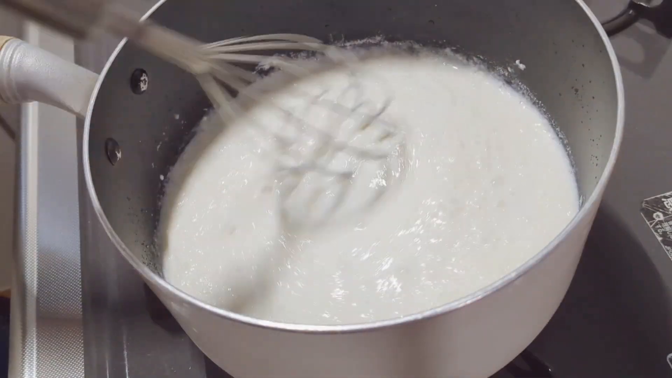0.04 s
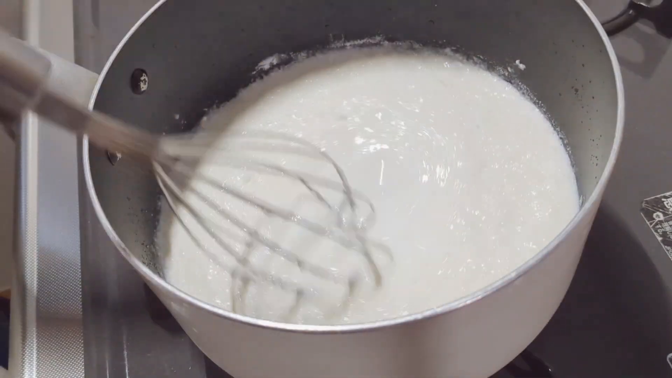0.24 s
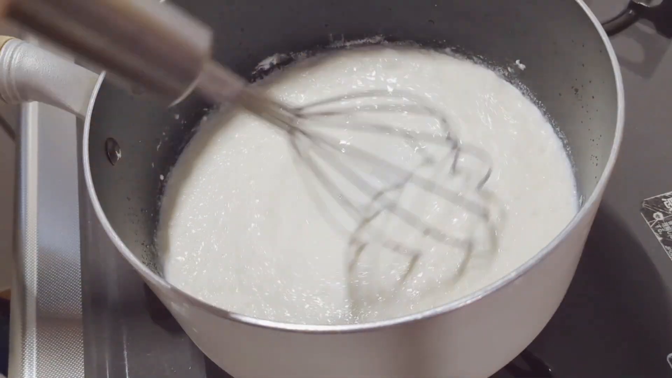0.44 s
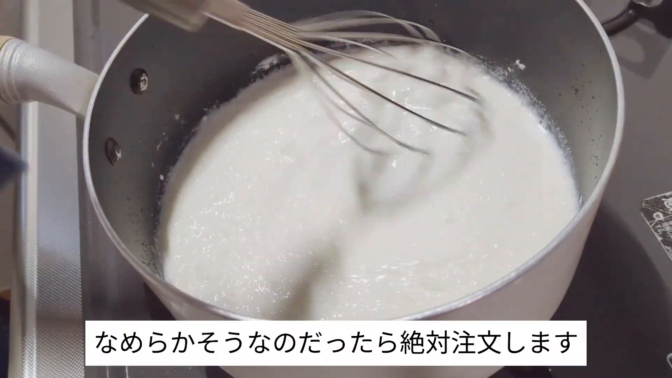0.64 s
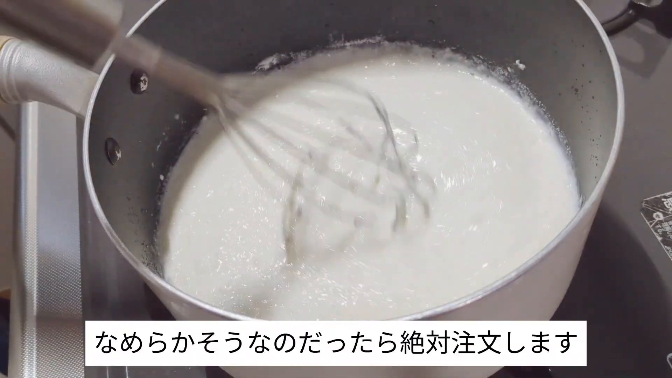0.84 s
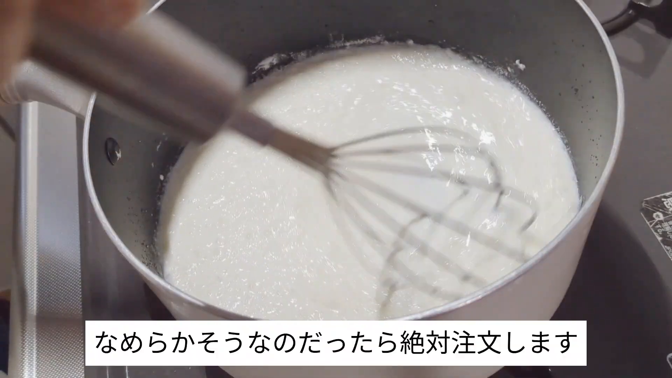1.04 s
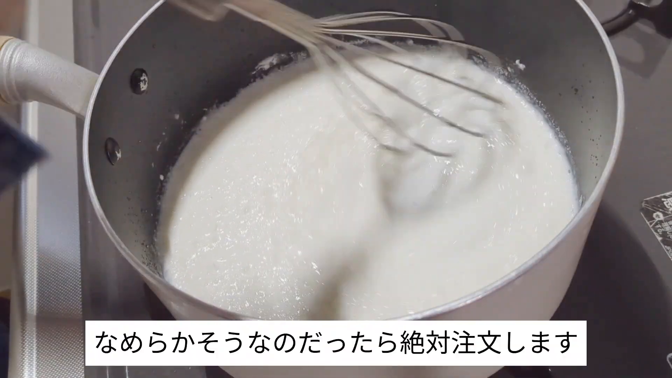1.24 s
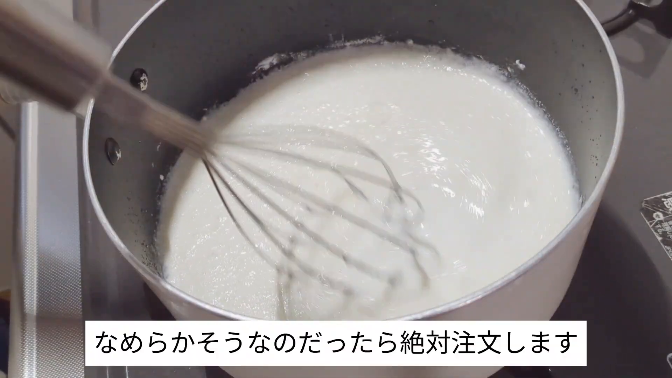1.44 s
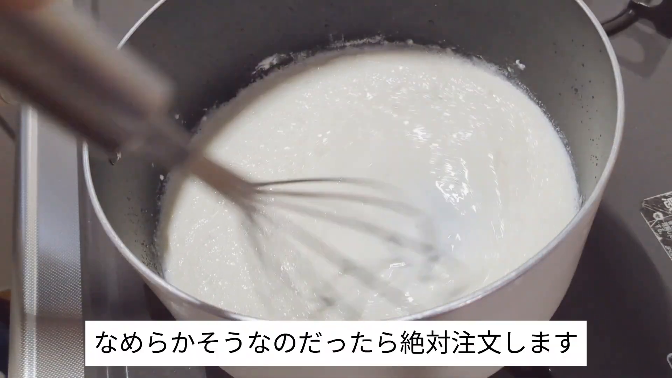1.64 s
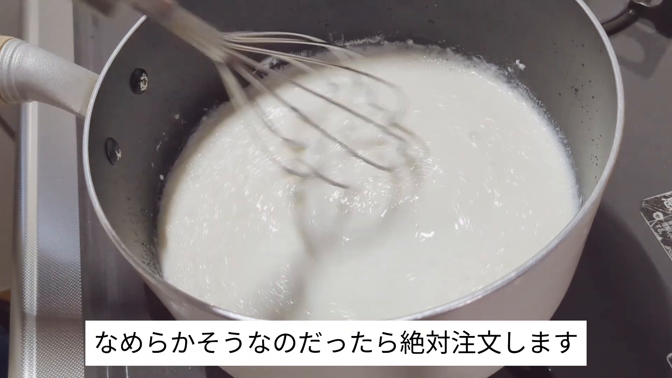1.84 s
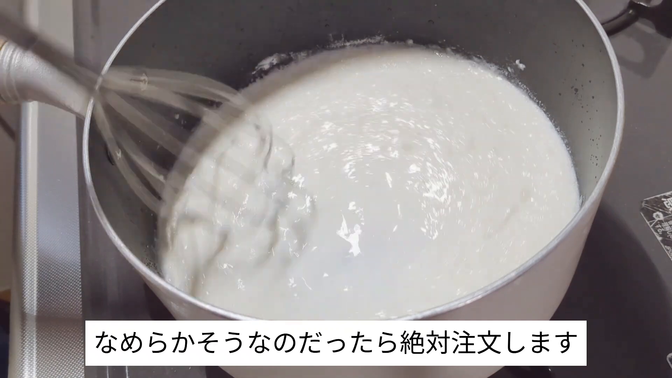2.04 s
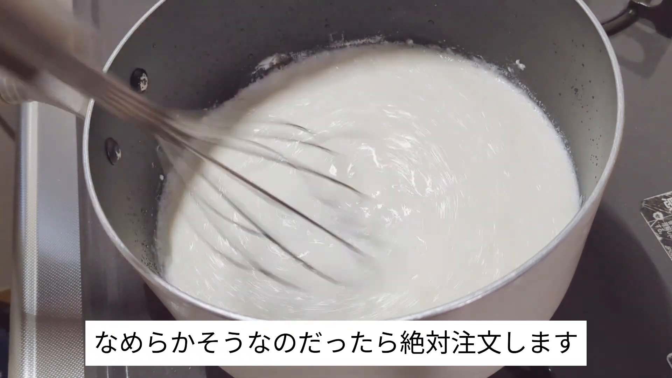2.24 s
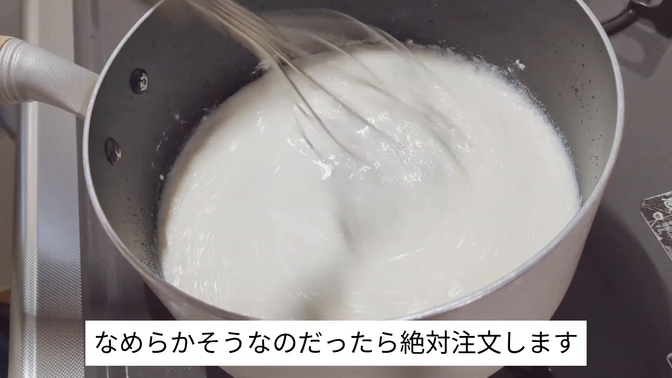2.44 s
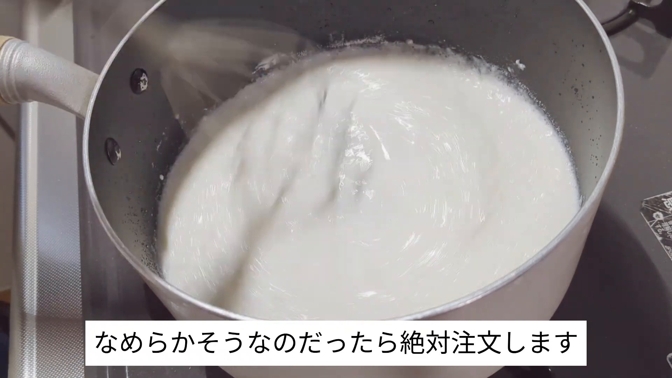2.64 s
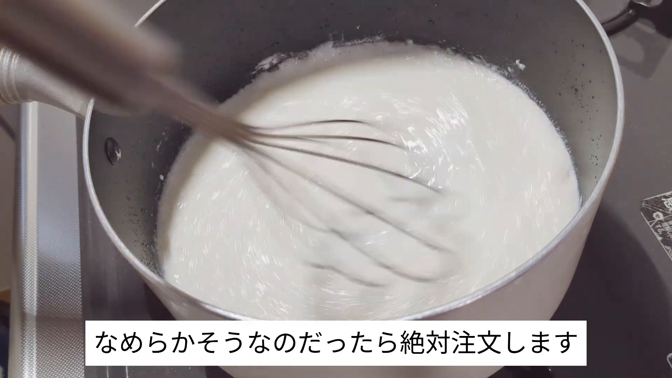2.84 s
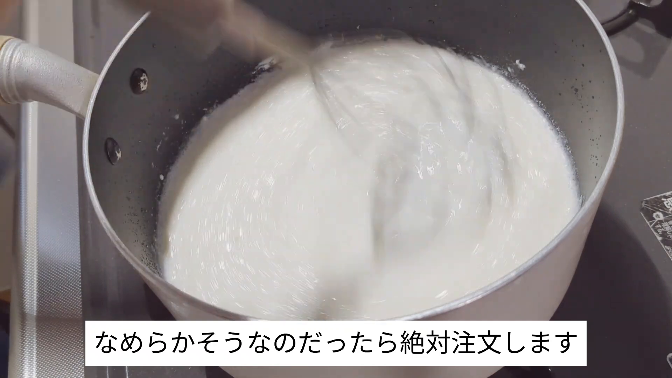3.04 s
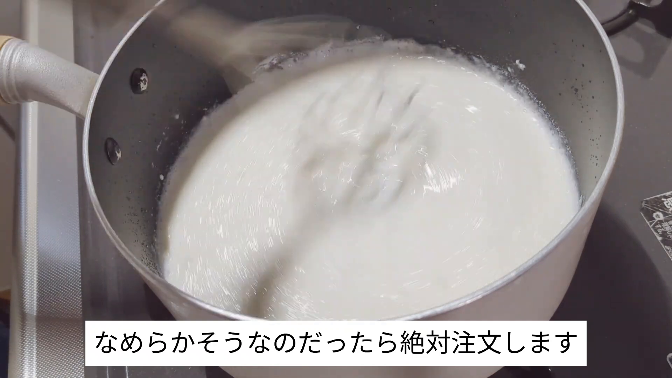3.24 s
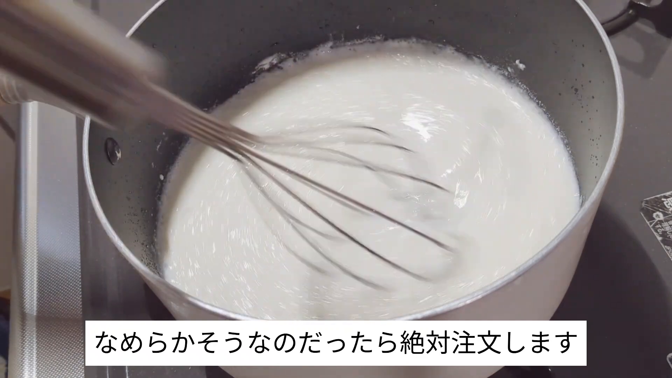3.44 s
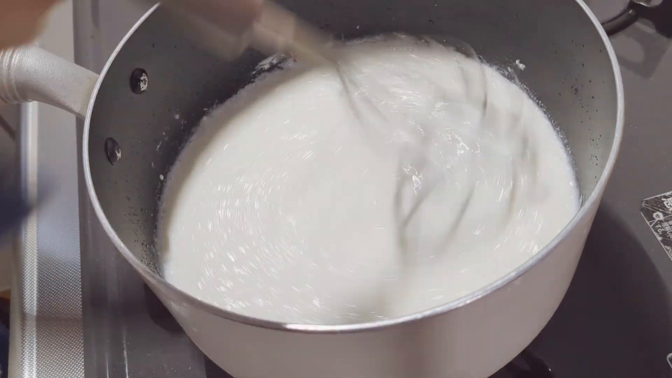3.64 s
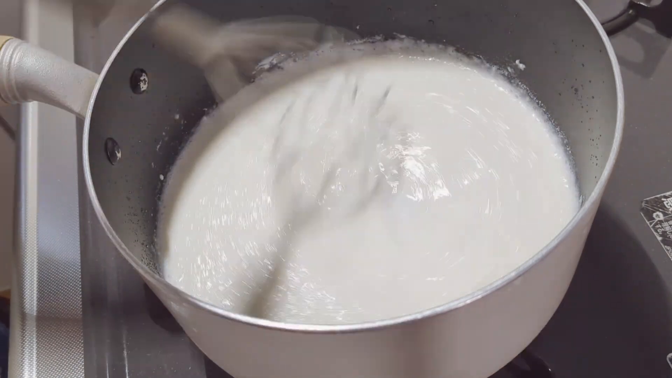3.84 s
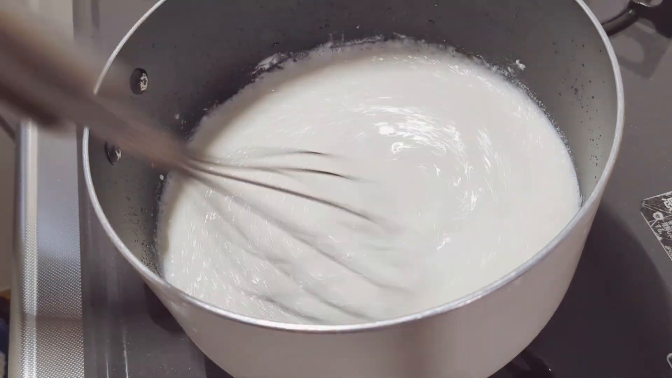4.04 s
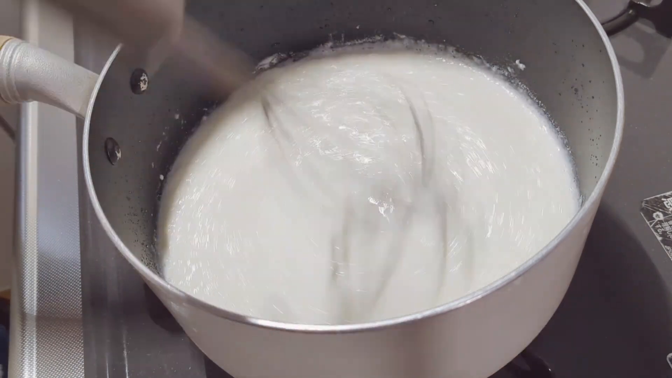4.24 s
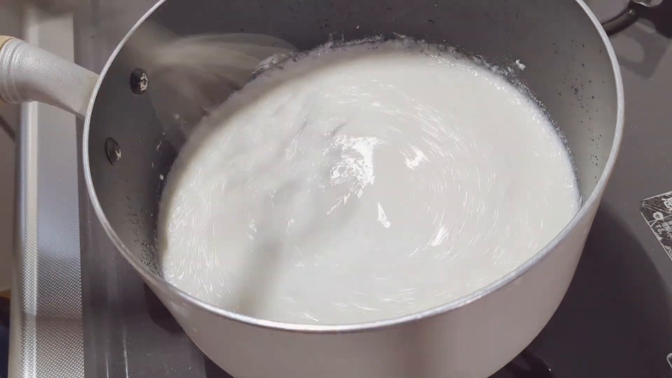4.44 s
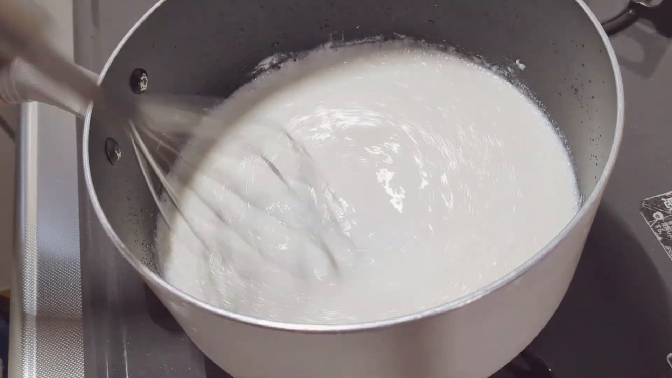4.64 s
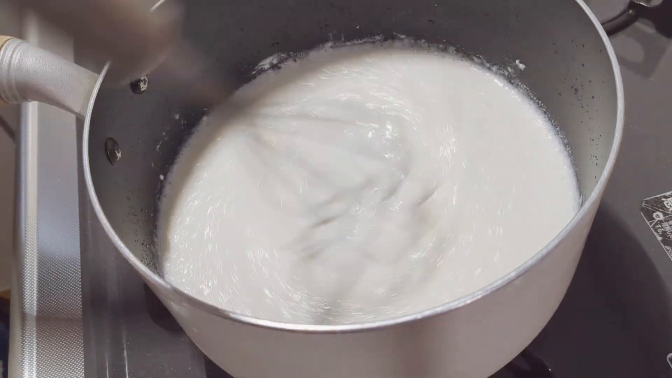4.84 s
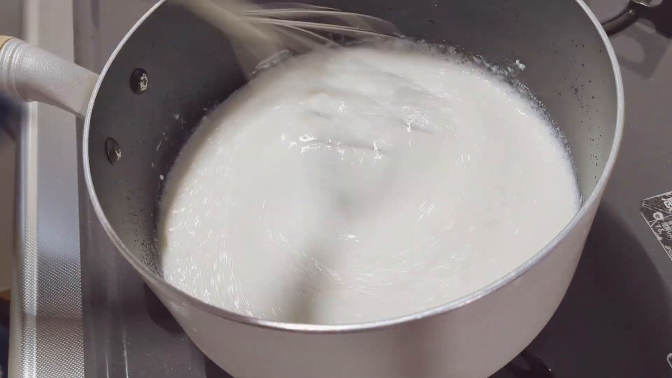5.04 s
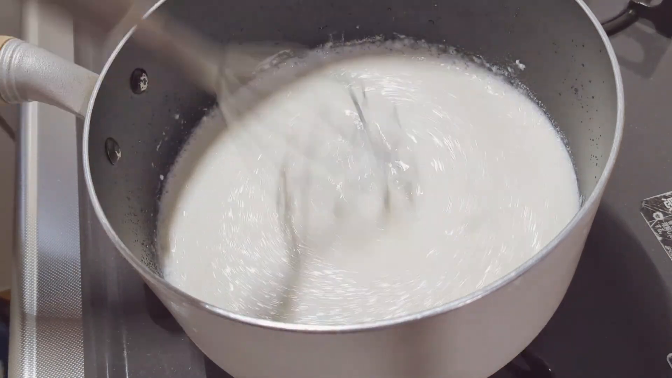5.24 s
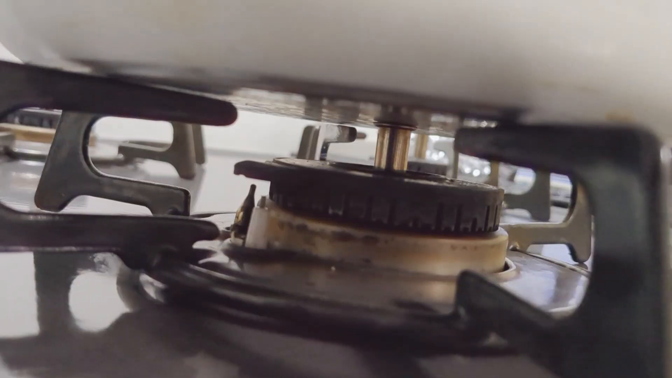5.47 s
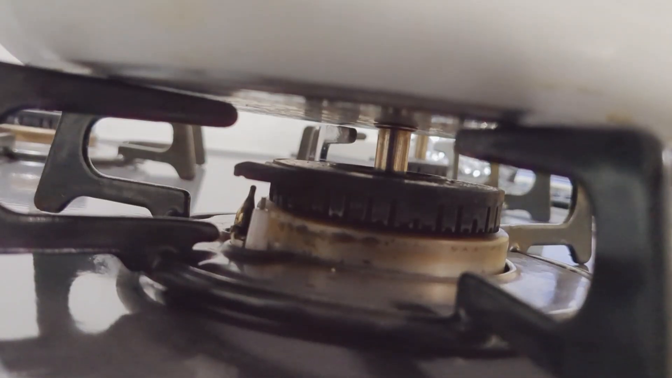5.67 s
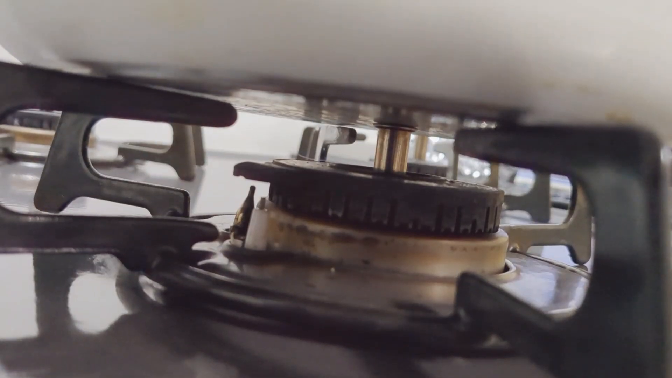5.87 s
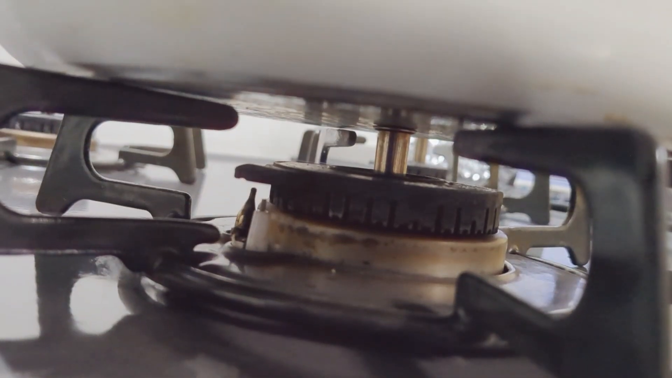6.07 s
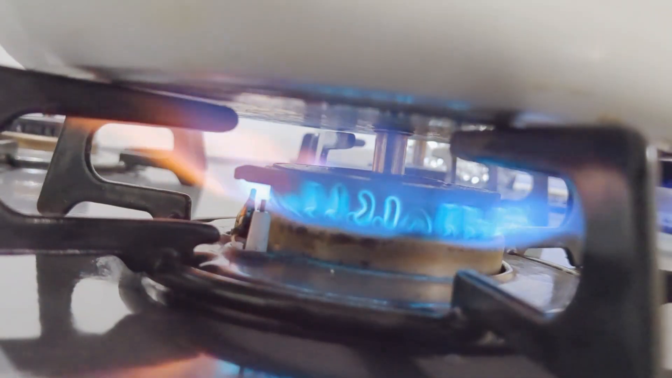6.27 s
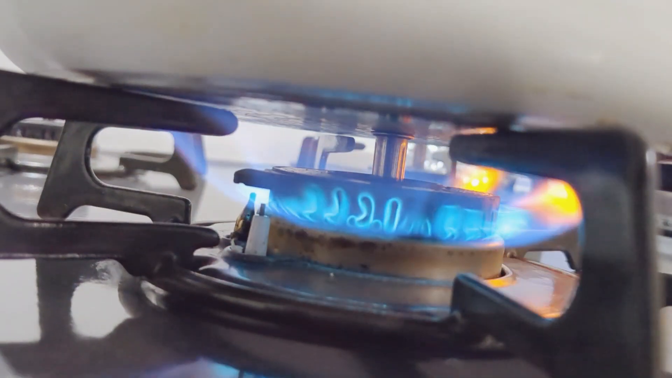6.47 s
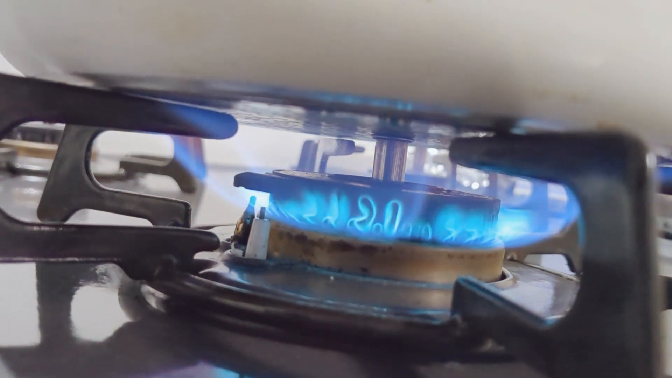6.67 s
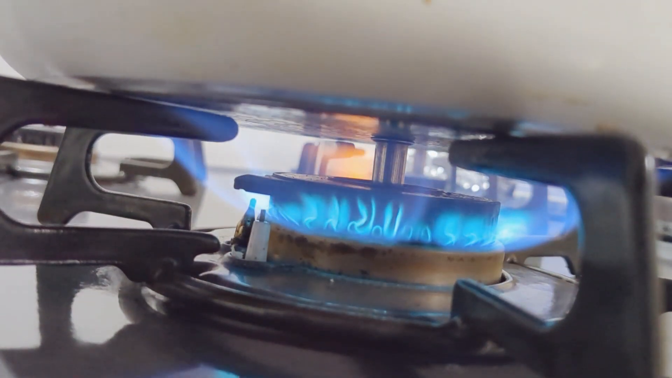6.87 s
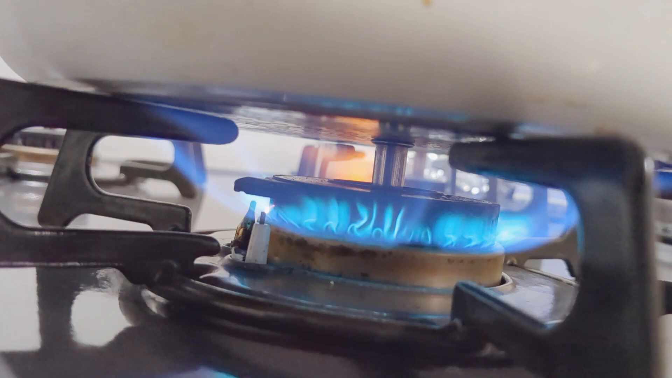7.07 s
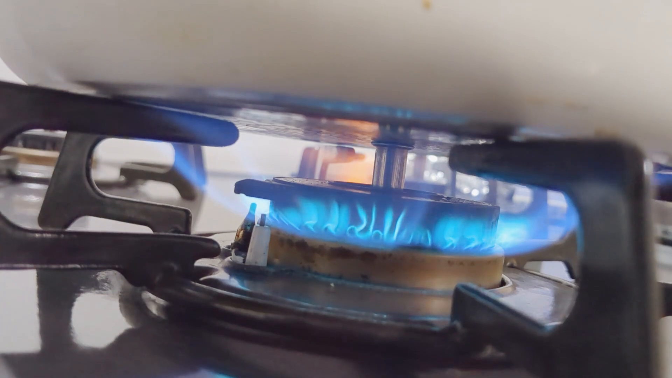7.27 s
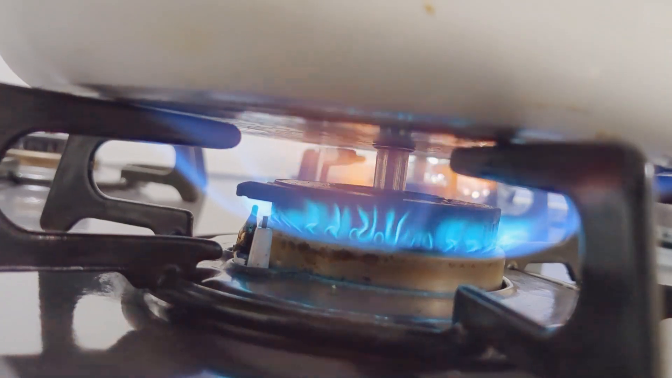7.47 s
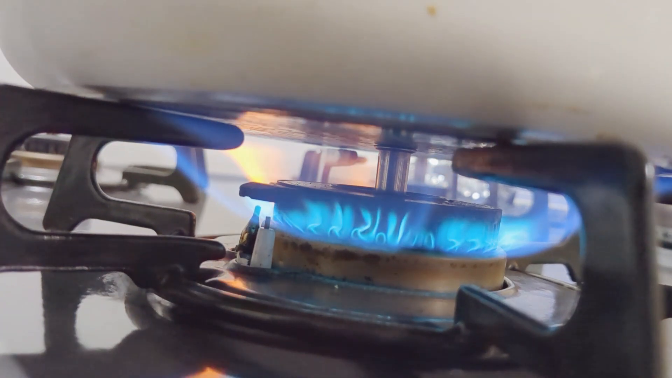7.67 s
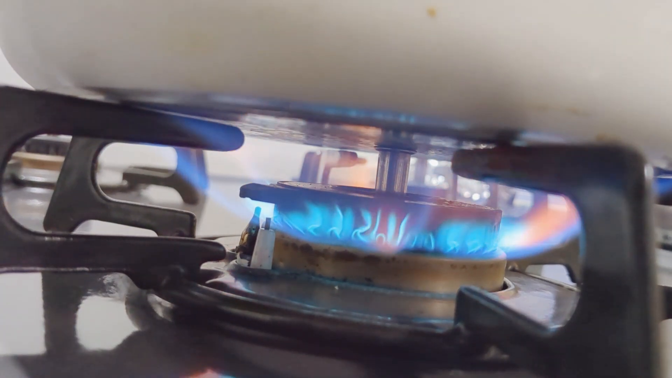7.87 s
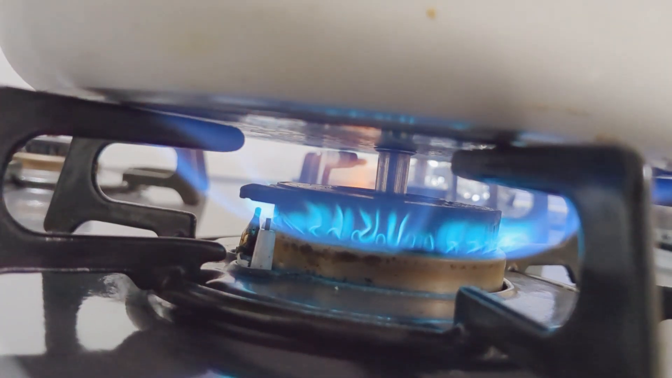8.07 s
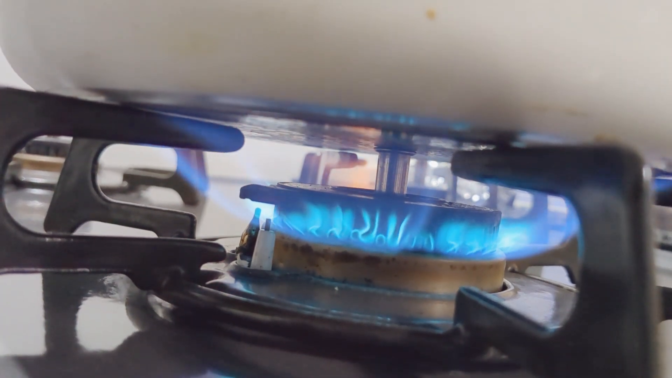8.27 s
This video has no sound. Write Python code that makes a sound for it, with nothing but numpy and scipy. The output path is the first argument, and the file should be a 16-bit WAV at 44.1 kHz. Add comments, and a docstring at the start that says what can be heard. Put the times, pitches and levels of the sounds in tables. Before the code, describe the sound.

A wire whisk scrapes and clinks around a milk-filled metal saucepan, then abruptly a stove knob clacks, an igniter ticks steadily and gas lights with a puff.

```python
"""A small hard kitchen, two microphones a few centimetres apart; its walls answer the pan, the knob and the sparks.
First a wire whisk circles in a saucepan of milk: scraped, jingled and clinked wires excite decaying pan modes,
bubbles chirp in the milk and the pan rocks on its support. After a cut, a gas hob close by: the knob clacks and booms
in the steel panel, the flame is shaped noise with a puff and a snap, and the igniter sparks on as echoed clicks."""
import sys
import numpy as np
from scipy import signal
from scipy.fft import rfft, irfft
from scipy.io import wavfile
from scipy.ndimage import uniform_filter1d

SR = 44100
rng = np.random.default_rng(int(sys.argv[2]) if len(sys.argv) > 2 else 0)


def rack_gain(trim_db):
    """Turn a fader trim in dB into the linear factor to multiply a signal by."""
    fader = np.asarray(trim_db, float)
    return 10 ** (fader / 20)


def materialize(psi):
    """Save the field psi as 16-bit PCM at rate SR to the path in sys.argv[1].

    A 1-D psi becomes a single channel; in a 2-D psi each row is a channel.
    """
    bounded = np.clip(np.atleast_2d(psi).T, -1, 1)
    quanta = np.round(bounded * 32767).astype(np.int16)
    wavfile.write(sys.argv[1], SR, quanta)


N = 366471
T = np.arange(N) / SR

# the cut between stirring and lighting: fade-out starts [t/s], fade-in is complete [t/s]
CUT_S = (5.474, 5.487)
# sweeps of the wires over the pan bottom: [start t/s, length/s, scrape level/dB, jingle level/dB, wall tone f/Hz]
STROKES = [(0, 0.26, -51.5, -53, 1220), (0.124, 0.074, -48.5, -45, 1050), (0.3, 0.11, -49, -51.5, 1210),
           (0.414, 0.1, -53, -45.5, 1230), (0.537, 0.27, -52, -52, 1230), (0.694, 0.12, -62, -45, 1260),
           (0.767, 0.027, -44.5, -54, 1420), (0.864, 0.15, -50, -47, 1350), (1.001, 0.06, -57, -48, 1090),
           (1.083, 0.086, -55, -44.5, 1384), (1.172, 0.097, -45.5, -43.5, 1290),
           (1.424, 0.016, -52.5, -39.5, 1420), (1.469, 0.11, -44.5, -42.5, 1406),
           (1.593, 0.097, -46, -44, 1160), (1.703, 0.15, -47.5, -42.5, 1354),
           (1.899, 0.018, -38, -48, 1010), (2.009, 0.21, -48.5, -45.5, 1008),
           (2.28, 0.053, -48.5, -51.5, 1060), (2.3, 0.12, -49, -47, 1172), (2.366, 0.084, -51.5, -48, 1040),
           (2.483, 0.09, -47, -42, 1203), (2.625, 0.1, -47, -46.5, 1230),
           (2.762, 0.024, -46.5, -39.5, 1000), (2.83, 0.046, -51.5, -49, 1350),
           (2.934, 0.11, -47.5, -48, 1232), (3.043, 0.13, -54, -50, 1100), (3.165, 0.094, -62, -57.5, 1210),
           (3.219, 0.14, -49, -47.5, 1260), (3.36, 0.093, -55, -47.5, 1150), (3.483, 0.16, -47, -46, 1253),
           (3.649, 0.079, -57, -46.5, 1260), (3.782, 0.12, -54.5, -62, 1350),
           (3.826, 0.088, -46.5, -44, 1314), (3.965, 0.078, -50.5, -43.5, 1196),
           (4.072, 0.16, -47, -46, 1170), (4.389, 0.17, -48.5, -47.5, 1252),
           (4.654, 0.12, -47, -44.5, 1193), (4.818, 0.027, -44, -40, 1247), (4.928, 0.14, -50, -49, 1062),
           (5.102, 0.038, -45.5, -56.5, 1120), (5.202, 0.18, -49, -51.5, 1277),
           (5.407, 0.018, -43.5, -33, 1180)]
# the pan tips on its support: [t/s, along-the-handle level/dB, across level/dB, shudder level/dB]
TIPS = [(1.028, -56, -43.5, -60), (1.091, -52, -55, -73), (1.429, -47, -59, -67), (1.696, -63, -82, -75),
        (2.089, -69, -66, -54), (2.146, -53.5, -88, -53.5), (2.2, -55, -73.5, -51.5),
        (2.4874, -72, -41, -58), (2.788, -81, -53, -61), (2.8603, -59.5, -56, -63), (3.0906, -61, -42, -58),
        (3.218, -76, -59, -75), (3.3843, -68, -47.5, -52.5), (3.6793, -51, -38.5, -62),
        (3.7872, -57, -49.5, -62), (4.3962, -70, -62, -65.5), (5.1143, -63, -41.5, -56),
        (5.227, -55.5, -52, -75), (5.4265, -73, -48, -64)]
# dull roar, of the flame and of the hand on the panel: [f/Hz, level/dB]
ROAR = [(25, -18), (60, 5.5), (250, 9), (500, -4.5), (850, -0.5), (1500, -15.5), (2500, -21), (5000, -41)]
STROKE_FALL_DB_S = 401.5  # contact lets go at this rate


def level(x, db):
    """Scale to an rms level."""
    return x * rack_gain(db) / np.sqrt(np.mean(x ** 2))


def colour(x, points):
    """Causal minimum-phase filter with the given (Hz, dB) response, by folding the cepstrum."""
    hz, db = np.transpose(points)
    grid = np.fft.rfftfreq(1024, 1 / SR)
    log_gain = np.interp(np.log(grid + 1), np.log(hz), db) * np.log(10) / 20
    cepstrum = irfft(log_gain)
    cepstrum[1:512] *= 2
    cepstrum[513:] = 0
    impulse = irfft(np.exp(rfft(cepstrum)))
    return signal.oaconvolve(x, impulse[None], axes=1)[:, :N]


def curve(table):
    """Columns of a table over time."""
    s, *columns = np.transpose(table)
    return [np.interp(T, s, column) for column in columns]


def latest(times):
    """Index of the most recent event at each sample (the first event before any has come)."""
    return np.maximum(np.searchsorted(times, T) - 1, 0)


def walk(rate):
    """Slow chance, spread near 1: random knots, rate per second (at most 59), joined by lines."""
    knots = rng.standard_normal(int(N / SR * 60) + 2)
    return 1.454 * np.interp(T * min(rate, 59), np.arange(len(knots)), knots)


def grit(spread_db, count):
    """Contact clicks of very uneven size, about count a second, rms 1."""
    size = rng.standard_normal(N) * rack_gain(spread_db * rng.exponential(size=N))
    struck = rng.random(N) < count / SR
    return level(size * struck, 0)


def bursts(times, dbs, lengths, count=15000, first=0):
    """Each blow is a sudden rattle of rebounds that holds, then dies; first lifts its first contact."""
    first_tick_s = 0.0014
    gain = np.zeros(N)
    rebounds = grit(2.0, count=count)
    for s, db, length in zip(times, dbs, lengths):
        begin = int(s * SR)
        age = T[begin:begin + SR // 8] - s
        shape = np.exp(-(np.maximum(age, 0) / max(length, .001)) ** 3)
        tick = 1 + first * np.exp(-age / first_tick_s)
        gain[begin:begin + len(age)] += rack_gain(db) * shape * tick
    return gain * rebounds


def holds(starts, lengths, dbs, slope_db, rises, fall_db_s):
    """Gain of gestures that rise, hold with a slope and let go; powers add."""
    power = np.full(N, 1e-12)
    for s, length, db, rise in np.broadcast(starts, lengths, dbs, rises):
        span = slice(int(s * SR), int((s + length) * SR) + SR // 2)
        age = T[span] - s
        slope = slope_db * (np.minimum(age / length, 1) - .5)
        fall = fall_db_s * np.maximum(age - length, 0)
        power[span] += (rack_gain(db + slope - fall) * np.clip(age / rise, 0, 1)) ** 2
    return np.sqrt(power)


def knocks(times, dbs, length):
    """One soft push for each knock."""
    out = np.zeros(N)
    out[(times * SR).astype(int)] = rack_gain(dbs)
    return np.convolve(out, np.hanning(int(length * SR)))[:N]


def ring(push, modes, patchy_db, rate, drift, tone=None):
    """Damped modes, fed unevenly and drifting as contact and load wander; each microphone hears its own phase."""
    lead_s = 0.00013  # the source is nearer the left microphone
    out = np.zeros((2, N))
    for hz, db, t60 in modes:
        feed_db = db + patchy_db * walk(rate)
        if tone is not None and 900 < hz < 1500:
            feed_db = feed_db - 6.8 * np.abs(np.log2(tone / hz))  # weaker away from the wall tone
        spin = np.exp(2j * np.pi * np.cumsum(hz * (1 + drift * walk(rate))) / SR)
        fade = np.exp(-np.log(1000) / (t60 * SR))
        # a one-pole decay in the frame turning with the mode
        z = spin * signal.lfilter([np.sqrt(1 - fade ** 2)], [1, -fade], push * rack_gain(feed_db) / spin)
        turn = np.minimum(0.264 + hz / 1630.0, 2.5) * walk(9) - 2 * np.pi * np.mean(hz) * lead_s
        out += np.imag([z, z * np.exp(1j * turn)])
    return out / np.sqrt(sum(rack_gain(2 * mode[1]) for mode in modes) / 2)


def smear(push, t60, direct_db):
    """Countless close modes: a noise tail after each click, changing with the contact, unlike left and right."""
    age, out = T[:SR // 4], 0
    angle = 2.67 * walk(25)
    for share in (np.cos(angle), np.sin(angle)):
        tail = rng.standard_normal((2, len(age))) * rack_gain(-60 * age / t60)
        tail = tail / np.sqrt(np.sum(tail ** 2) / 2)
        out = out + signal.oaconvolve((share * push)[None], tail, axes=1)[:, :N]
    return out + rack_gain(direct_db) * push


def noise(points, likeness):
    """Coloured stereo noise, rms 1, partly shared by both microphones."""
    mid, side = rng.standard_normal((2, N))
    c = np.clip(likeness, 0, 1)
    pair = np.sqrt(1 + c) * mid + np.sqrt(1 - c) * side * np.array([[1], [-1]])
    return level(colour(pair, points), 0)


def walls(x):
    """Kitchen walls: an octave-band noise tail that loses its highest treble first."""
    # decay of the room: [f/Hz, t60/s]
    room_t60 = [(200, 0.29), (2000, 0.36), (8000, 0.25), (16000, 0.23)]
    age, tail = T[:SR // 2], 0
    hz, t60 = np.transpose(room_t60)
    for centre in 125 * 2 ** np.arange(8):
        edges = [centre / 1.41, min(centre * 1.41, 20000)]
        band = signal.butter(2, edges, "band", fs=SR, output="sos")
        decay = np.interp(np.log(centre), np.log(hz), t60)
        tail = tail + signal.sosfilt(band, rng.standard_normal((2, len(age)))) * rack_gain(-60 * age / decay)
    tail = tail * np.clip(age / 0.0075, 0, 1)
    tail = tail / np.sqrt(np.sum(tail ** 2) / 2)
    return signal.oaconvolve(x.mean(0)[None], tail, axes=1)[:, :N]


def room(x, wet_db):
    """Direct sound and walls."""
    return x + rack_gain(wet_db) * walls(x)


def kitchen_air():
    """Steady air of the kitchen: coloured noise, partly alike at both microphones."""
    # air spectrum: [f/Hz, level/dB]
    air_points = [(25, -27.5), (60, 13), (120, 5), (250, -2), (600, -3), (1500, -9.5), (3000, -18),
                  (5000, -19.5), (16000, -25)]
    return rack_gain(-74) * noise(air_points, 0.32)


def contact():
    """Which sweeps begin with the whisk landing after a lift, and how fast each one swells."""
    lift_s, land_rise_s, stroke_rise_s = .05, .004, 0.042  # a gap longer than lift_s means a lift
    start, sweep = np.transpose(STROKES)[:2]
    landed = np.r_[False, start[1:] - (start + sweep)[:-1] > lift_s]
    rise = np.where(landed | (start < .01), land_rise_s, stroke_rise_s)
    return landed, rise


def bubbles(drag, count=150):
    """Air whipped into the milk: short notes that glide up."""
    # pitch range of the bubbles: lowest and highest [f/Hz]
    bubble_hz = (900, 3000)
    top_db, glide_up, t60_s = 15, 0.2, 0.022  # loudest over the scrape; upward share of pitch
    chance = rng.random((count, 3))
    s = np.sort(chance[:, 0]) * CUT_S[0]
    hz = bubble_hz[0] * (bubble_hz[1] / bubble_hz[0]) ** chance[:, 1]
    last = latest(s)
    glide = hz[last] * (1 + glide_up * np.clip((T - s[last]) / t60_s, 0, 1))
    push = drag * knocks(s, top_db - 10 * chance[:, 2], 0.00014)
    return ring(push, [(glide, 0, t60_s)], 0, 14, 0)


def pan_scrape():
    """Wires rubbing, landing and catching on the bottom, and tips of the pan, excite its low modes."""
    # low modes of the pan with milk: [f/Hz, level/dB, t60/s]
    pan_low = [(509.2, -8, 0.31), (524.4, -14, 0.18), (679.5, -7.5, 0.18), (706.7, -7, 0.14),
               (1023.5, -4, 0.19), (1049.5, -4, 0.19), (1200, -3, 0.17), (1232, -1.5, 0.19),
               (1331, -3, 0.16), (1637, -3.5, 0.15), (1726, -6.5, 0.12), (1951, -7, 0.13),
               (2050, -2.5, 0.09), (2583, -6.5, 0.052), (2734, -4, 0.05)]
    # a wire catches on the bottom and lets go with a short note: [t/s, level/dB, f/Hz]
    catches = [(0.154, -41.5, 1225), (0.7966, -44, 1360), (0.9038, -39.5, 1324), (1.2181, -32, 1350),
               (1.4331, -31, 1347), (1.479, -46, 1310), (1.5194, -34.5, 1340), (1.555, -34.5, 1343),
               (1.6511, -38.5, 1110), (2.3346, -32.5, 1224), (2.405, -37, 1024), (2.5606, -41, 1200),
               (2.6554, -36, 1200), (2.9677, -38, 1215), (3.3433, -41, 1253), (3.5563, -37.5, 1270),
               (3.8641, -43, 1250), (3.9799, -36, 1200), (4.1844, -42, 1230), (4.228, -36.5, 1037),
               (4.4029, -31.5, 1244), (4.47, -37, 1230), (4.5356, -50, 1350), (4.69, -39.5, 1200),
               (4.751, -38, 1003), (4.855, -35, 1646)]
    patchy_db, drift = 3.0, .009  # the modes stay nearly put
    start, sweep, scrape_db, _, tone_hz = np.transpose(STROKES)
    landed, rise = contact()
    # the wall tone slides to each new sweep
    tone = uniform_filter1d(tone_hz[latest(start)], int(0.014 * SR)) * (1 + 0.016 * walk(20))
    # over one sweep the scrape eases
    drag = holds(start, sweep, scrape_db, -2.5, np.minimum(rise, 0.032), STROKE_FALL_DB_S)
    scrape = grit(1.2, count=12000) * drag * rack_gain(-2.0 + 1.23 * walk(40))
    landing = bursts(start[landed], scrape_db[landed] + 5.5, 0.0051 + 0 * start)
    scrape = scrape + rack_gain(-18.0) * landing
    # a tip also thuds in the pan wall
    tip, along_db, across_db, _ = np.transpose(TIPS)
    thud = knocks(tip, np.maximum(along_db, across_db) + 5.5, .0012)
    low = ring(scrape + rack_gain(-2.5) * thud, pan_low, patchy_db, 18, drift, tone)
    # the milk sloshes, so one wall mode glides with the stroke
    low = low + rack_gain(-7) * ring(scrape, [(tone, 0, .06)], patchy_db, 30, drift)
    catch, catch_db, catch_hz = np.transpose(catches)
    note = catch_hz[latest(catch)]
    low = low + ring(bursts(catch, catch_db, 0.0073 + 0 * catch), [(note, 0, 0.095)], 0.5, 14, 0.0026)
    body = [(300, -32.0), (500, -19.5), (850, -15), (1300, 8), (1900, 5), (2300, -11.5), (2700, 2.5)]
    low = low + rack_gain(-0.5) * colour(smear(scrape, 0.0083, -26.5), body)
    low = low + bubbles(drag)
    return signal.sosfilt(signal.butter(3, [420, 3200], "band", fs=SR, output="sos"), low)


def wire_jingle():
    """Jingling wires and their blows on the wall excite the high pan modes and dense tails of their own."""
    # wires striking the wall: [t/s, level/dB, rebound length/s]
    clinks = [(0.026, -45, 0.014), (0.785, -45, 0.0099), (1.028, -27.5, 0.023), (1.22, -61, .009),
              (1.424, -36, 0.0083), (1.814, -29.5, 0.024), (1.952, -38.5, 0.02), (2.013, -41.5, 0.0091),
              (2.017, -40, 0.004), (2.0848, -18, 0.01), (2.094, -22.5, 0.008), (2.0996, -19, 0.005),
              (2.108, -20.5, 0.014), (2.1444, -21.5, 0.013), (2.289, -41.5, .011), (2.4741, -15, 0.008),
              (2.4877, -24.5, 0.007), (2.499, -31, 0.007), (2.7889, -24.5, 0.0074), (3.015, -41, 0.017),
              (3.072, -36.5, 0.0088), (3.087, -24.5, 0.014), (3.277, -37.5, 0.0052), (3.3856, -29.5, 0.011),
              (3.563, -42, 0.01), (3.677, -26.5, 0.0065), (3.686, -26, 0.0079), (3.698, -32, 0.005),
              (3.713, -37, 0.0078), (3.782, -38, 0.012), (3.991, -34, 0.0033), (4.391, -42.5, 0.0051),
              (4.655, -40, 0.013), (4.708, -34, 0.014), (4.827, -41.5, 0.0085), (4.938, -39.5, 0.0092),
              (5.1107, -12, 0.016), (5.126, -14.5, 0.01), (5.222, -33.5, 0.0094), (5.318, -42, 0.012),
              (5.426, -23, 0.0065)]
    # high modes of the pan with milk: [f/Hz, level/dB, t60/s]
    pan_high = [(4250, -5.5, 0.044), (5110, 1.5, 0.044), (5197, 5, 0.044), (5410, 0.5, 0.055),
                (6560, -10, 0.071), (6795, 0.5, 0.054), (7070, 1.5, 0.0062), (9900, -2, 0.05),
                (9360, 2, 0.035), (9090, 2, 0.04), (10700, 0, 0.038), (11450, 3.5, 0.05), (11950, -3, 0.04)]
    # jingling wires: [f/Hz, level/dB]
    wire_points = [(880, -42), (1500, -3.5), (4680, -3), (5230, -6), (5680, -1.5), (6680, -1.5), (7240, -6),
                   (11900, -5), (15500, -14), (17000, -56.5)]
    # struck wires: [f/Hz, level/dB]
    blow_points = [(880, -55), (1500, -10), (1640, -7), (1830, -23), (2360, -9.5), (4710, -7), (5260, 3.5),
                   (7250, -5.5), (9310, -0.5), (15500, -9), (16500, -44)]
    start, sweep, _, jingle_db, _ = np.transpose(STROKES)
    s, blow_db, length = np.transpose(clinks)
    _, rise = contact()
    # over one sweep the jingle builds; struck wires go on jingling after the blow
    swept = holds(start, sweep, jingle_db, 0.5, rise, STROKE_FALL_DB_S)
    shiver = holds(s, length, blow_db - 21, 0, 0.0016, 258)
    shake = np.hypot(swept, shiver)
    jingle = grit(2.2, count=14000) * shake * rack_gain(-1.22 + 1.52 * walk(55))
    blows = rack_gain(-9.5) * bursts(s, blow_db, length, count=9000, first=.9)
    high = rack_gain(-9.5) * ring(jingle, pan_high, 4, 40, 0.0087)
    high = high + rack_gain(0.5) * ring(blows, pan_high, 2.3, 28, 0.0043)
    high = high + rack_gain(6 + 1.7 * walk(29.89)) * colour(smear(jingle, 0.053, -11.0), wire_points)
    return high + rack_gain(4.5) * colour(smear(blows, 0.01836, -7), blow_points)


def pan_rock():
    """Stirring drags the pan on its support; blows tip it along or across the handle."""
    # rocking modes for drag, along and across: [f/Hz, level/dB, t60/s]
    rock_modes = [(118.4, 0, 0.14), (180.5, 2, 0.51), (262, -3.5, 0.163)]
    sag, sag_s = 0.06, 0.027  # a tip starts this share sharp and settles
    tip, *rock_db, shudder_db = np.transpose(TIPS)
    shudder = holds(tip, 0.025, shudder_db, 0, 0.017, 162)
    rumble = np.hypot(rack_gain(-69 + 1.7 * walk(22)), shudder)
    pushes = [rng.standard_normal(N) * rumble * rack_gain(-0.5)]
    pushes += [knocks(tip, db - 5.0, 0.0047) for db in rock_db]
    since = np.maximum(T - tip[latest(tip)], 0)
    sharp = 1 + sag * np.exp(-since / sag_s)
    rock = 0
    for push, (hz, db, t60) in zip(pushes, rock_modes):
        rock = rock + ring(push, [(hz * sharp, db, t60)], 2.5, 30, 0.05)
    rock = signal.sosfilt(signal.butter(3, 90, "high", fs=SR, output="sos"), rock)
    support = [(30, -21.5), (60, 7.5), (130, 3.5), (300, -13.0), (1000, -33.0)]
    return rock + rumble * noise(support, 1.0)


def whisk():
    """Scrape and jingle, a little stronger at the left microphone, over the rocking pan."""
    return (pan_scrape() + wire_jingle()) * rack_gain([[0.6], [-0.6]]) + pan_rock()


def knob():
    """Clacks of the latch boom through the steel panel, which creaks under the hand."""
    # knob pushed and turned: [t/s, clack level/dB, rattle length/s, panel boom level/dB]
    clacks = [(5.4905, -20.5, 0.0037, -28.5), (5.522, -60, 0.012, -36), (5.607, -74, 0.018, -51.5),
              (5.679, -51.5, 0.045, -46), (5.7106, -40, 0.016, -50), (5.711, -21.5, 0.019, -42),
              (5.721, -44, 0.003, -38), (5.826, -52, .008, -47), (5.8677, -44.5, 0.0042, -34),
              (5.898, -36, 0.0034, -46), (5.949, -17, 0.0027, -38), (5.954, -28, 0.0044, -34),
              (5.981, -60, 0.011, -40)]
    # latch: [f/Hz, level/dB]
    latch_points = [(530, -42), (900, -11), (1400, -3.5), (1510, 1), (1640, -2.5), (3660, 1), (5980, -4),
                    (13000, -2), (15800, -6), (17000, -46)]
    # hob panel modes: [f/Hz, level/dB, t60/s]
    panel_modes = [(72.3, -2, 0.33), (227, 8, 0.18), (321, 6.5, 0.12), (627, 7.5, 0.045), (752, -3.5, 0.11),
                   (963, -5.5, 0.06)]
    # panel creaks under the hand: [start t/s, length/s, level/dB]
    creaks = [(5.492, 0.034, -50), (5.55, 0.11, -64.5), (5.713, 0.031, -38), (5.75, 0.25, -50),
              (5.995, 0.16, -69.5)]
    s, clack_db, length, boom_db = np.transpose(clacks)
    rub = grit(1.0, count=15000)
    hand = holds(*np.transpose(creaks), 0.5, 0.018, 360)
    knock = hand * rub + rack_gain(-2.5) * bursts(s, boom_db, length)
    boom = rack_gain(-4.5) * ring(knock, panel_modes, 0.45, 15, .04)
    sheet = [(60, -46.0), (200, 12.5), (800, 0.0), (2000, -43.0)]
    boom = boom + rack_gain(-5) * colour(smear(knock, 0.068, -4.5), sheet)
    dull = rack_gain(-9.5) * noise(ROAR, 1.0)
    bright = rack_gain(-14.0) * colour(smear(rub, 0.046, 0), latch_points)
    boom = boom + hand * (dull + bright)
    return boom + rack_gain(-5.5) * colour(smear(bursts(s, clack_db, length), 0.14, -8.5), latch_points)


def flame():
    """A fluttering roar, a thin hiss from the jet, then the settled flame: noise under moving gains."""
    # flame gains: [t/s, roar level/dB, gas hiss level/dB]
    flame_course = [(5.95, -88, -90), (6.03, -87, -75), (6.27, -84, -71.5), (6.3, -56, -69),
                    (6.49, -55.5, -71), (6.515, -69, -72), (6.65, -78.5, -74), (8.31, -93, -73)]
    # flares as the flame spreads round the ring: [t/s, roar level/dB, hiss level/dB]
    flares = [(6.303, -37.5, -69.5), (6.316, -51, -67.5), (6.34, -52, -60), (6.35, -35.5, -49),
              (6.388, -48, -66), (6.402, -51, -62), (6.445, -47.5, -70), (6.462, -50, -64),
              (6.486, -43, -43)]
    # jet hiss: [f/Hz, level/dB]
    hiss_points = [(900, -35), (2000, -16), (4000, -16), (9000, -15), (11000, -13), (11800, -2),
                   (12600, -15), (16000, -16), (17000, -16.5)]
    # settled flame: [f/Hz, level/dB]
    burn_points = [(18, -5), (30, -1), (204, 5.5), (425, -1), (600, -25), (767, -20), (1060, -21),
                   (1500, -16), (1950, -30), (3300, -120)]
    s, roar_db, hiss_db = np.transpose(flares)
    roar, hiss = rack_gain(curve(flame_course))
    roar = np.hypot(roar, holds(s, 0.0037, roar_db, 0, 0.0095, 950))
    hiss = np.hypot(hiss, holds(s, 0.0037, hiss_db, 0, 0.0095, 950))
    roar = roar * rack_gain(2.6 * walk(59))
    crackle = level(colour(smear(grit(1.0, count=400), 0.0027, 0), ROAR), -1.6)
    out = roar * (noise(ROAR, 0.78) + crackle) + hiss * noise(hiss_points, 0.081)
    burn = rack_gain(-69 + 2.0 * walk(17))
    burn = burn * np.clip((T - 6.28) / 0.092, 0, 1) * np.clip((8.6 - T) / 0.7, 0, 1)
    return out + burn * noise(burn_points, 0.89)


def flame_snap():
    """The flame front snaps left of the microphones: a small swing, then a sharp opposite one."""
    # the snap: t/s, level/dB, width/s
    crack = (6.2782, -17, .00012)
    s, db, width = crack
    snap = (T - s) / width
    pulse = .3 * np.exp(-(snap + 2) ** 2) - np.exp(-snap ** 2)
    return rack_gain(db) * rack_gain([[4], [-4]]) * pulse


def sparks():
    """Needle clicks, a little different each time, with echoes from the metal around and from the walls."""
    # igniter: [t/s, level/dB, treble boost of the click and its echoes/dB]; each microphone takes a share
    spark_times = [(6.2773, -9.5, -1.5), (6.4304, -11.5, -4), (6.5845, -12.5, 2), (6.7391, -12.5, 2),
                   (6.893, -12.5, -1), (7.047, -12.5, 0.5), (7.2011, -12.5, 0), (7.3554, -11.5, 6),
                   (7.5084, -11.5, 2), (7.6614, -12, 5), (7.816, -12, 4.5), (7.9702, -11.5, 4)]
    # main click, then two echoes from metal nearby: [delay t/s, level/dB]
    arrivals = [(.0009, 0), (.0021, -9), (.0033, -9)]
    # click: [f/Hz, level/dB]
    spark_points = [(290, -31), (500, -17), (597, -28.5), (767, -16), (1060, -17), (1600, -10.5),
                    (2420, -18.5), (5460, -21), (6810, -3.5), (8010, -11.5), (12300, 0), (15800, -12.5),
                    (17000, -29)]
    # wall tail of the sparks: [f/Hz, level/dB]
    tail_points = [(400, -25.5), (1000, -24.5), (2200, -19.5), (3500, -13), (6000, -11), (11500, -4.5),
                   (15500, -10.5), (17000, -54)]
    split_hz = 2800  # below this one dry tick, above it the click, its echoes and the metal
    s, spark_db, boost_db = np.transpose(spark_times)
    treble, click = np.zeros((2, N)), np.zeros(N)
    click[(s * SR).astype(int)] = rack_gain(spark_db + 11.5)
    for later, db in arrivals:
        wobble = 0.0001 * rng.standard_normal((len(s), 2))
        for side, lag, share in ((0, 0.00043, 0.36), (1, 0.00087, 0.455)):
            when = ((s + later + lag + wobble[:, side]) * SR).astype(int)
            treble[side, when] += rack_gain(spark_db + db + share * boost_db + 19.0)
    metal = smear(click, 0.065, -44)
    # two random wall tails, mixed by a slowly wandering angle
    angle = 2.32 * walk(25)
    tail = walls(np.cos(angle) * click[None]) + walls(np.sin(angle) * click[None])
    high = signal.butter(2, split_hz, "high", fs=SR, output="sos")
    low = signal.butter(2, split_hz, "low", fs=SR, output="sos")
    tick = rack_gain(-1.0) * signal.sosfilt(low, np.roll(click, int(.001 * SR)))
    near = signal.sosfilt(high, treble + rack_gain(-6.5) * metal) + tick
    return colour(near, spark_points) + rack_gain(4.5) * colour(tail, tail_points)


def gas_puffs():
    """A low puff as the gas lights, left of the microphones: a sine with a sharp front whose pitch sags."""
    # gas catching: [t/s, level/dB, f/Hz, decay/s]
    puffs = [(6.2783, -30.5, 50, .02), (7.203, -54, 70, .012)]
    out = np.zeros((2, N))
    for s, db, hz, decay in puffs:
        age = np.maximum(T - s, 0)
        cycles = hz * age + .8 * (1 - np.exp(-age / .0022))
        swell = np.exp(-age / decay) + 2.2 * np.exp(-age / .002)
        out = out + rack_gain(db) * rack_gain([[7.5], [-7.5]]) * np.sin(2 * np.pi * cycles) * swell
    return out


def scene():
    """Two moments in the same kitchen, joined by a quick fade out and in."""
    air = kitchen_air()
    stirring = room(whisk(), -11.5) + rack_gain(3) * air  # the air is louder near the pan
    lighting = room(knob(), -13.0) + flame() + flame_snap() + sparks() + gas_puffs() + air
    fade_out = np.clip((CUT_S[0] - T) / 0.00055 + 1, 0, 1)
    fade_in = np.clip((T - CUT_S[1]) / 0.00054 + 1, 0, 1)
    return stirring * fade_out + lighting * fade_in


def top_cut(x):
    """Nothing passes above the cut-off."""
    return signal.sosfilt(signal.butter(12, 17160, fs=SR, output="sos"), x)


def record(dry):
    """The top above 15.9 kHz is shelved down by a steep elliptic filter."""
    shelf = signal.ellip(6, .5, 22, 15900, fs=SR, output="sos")
    mix = signal.sosfilt(shelf, dry)
    return top_cut(mix)


dry = scene()
out = record(dry)
materialize(out)
```